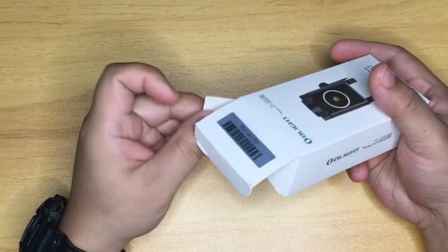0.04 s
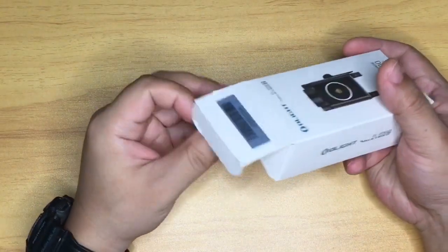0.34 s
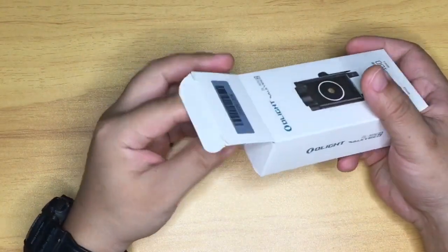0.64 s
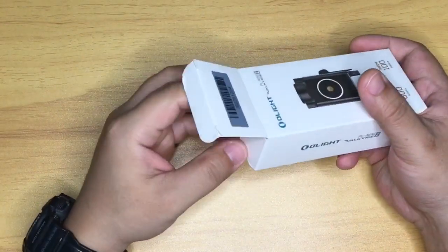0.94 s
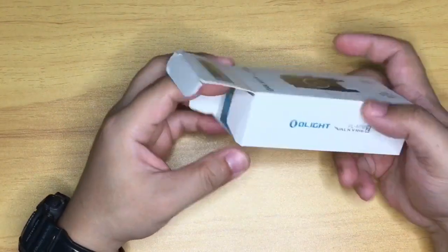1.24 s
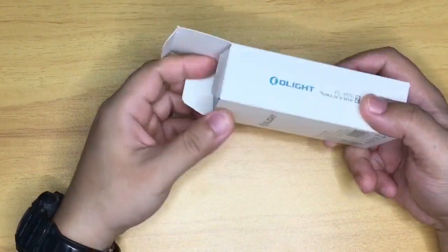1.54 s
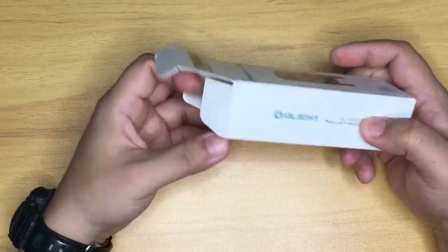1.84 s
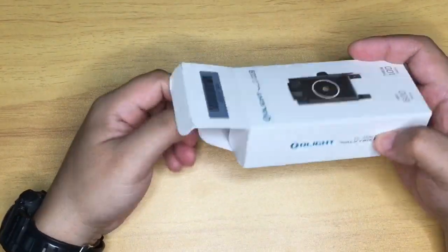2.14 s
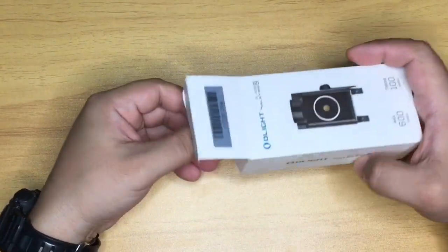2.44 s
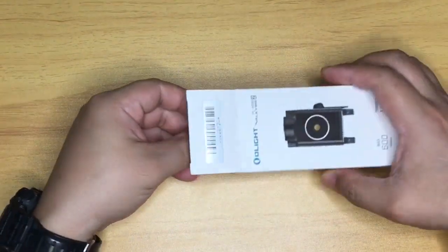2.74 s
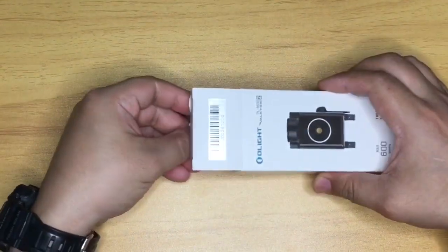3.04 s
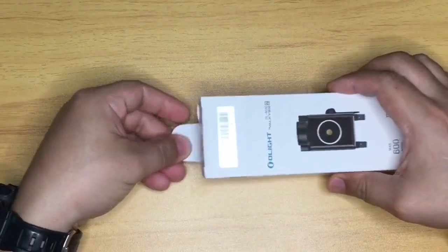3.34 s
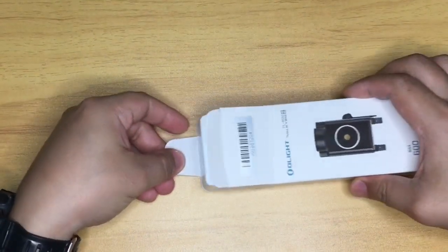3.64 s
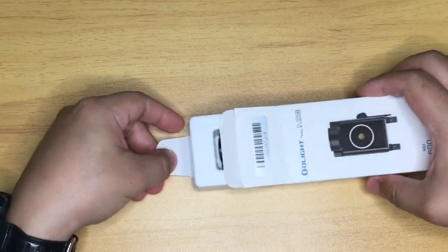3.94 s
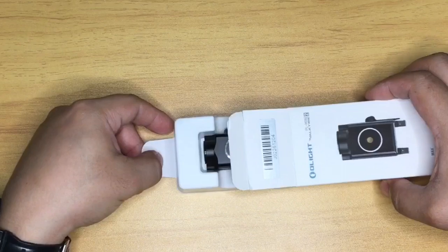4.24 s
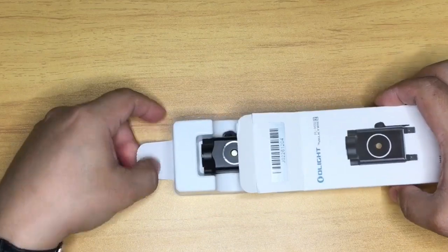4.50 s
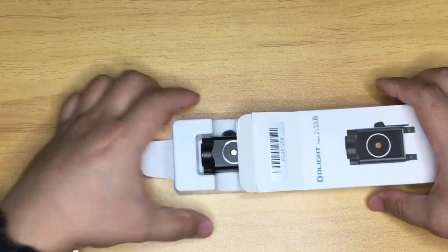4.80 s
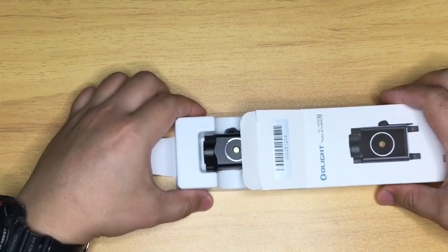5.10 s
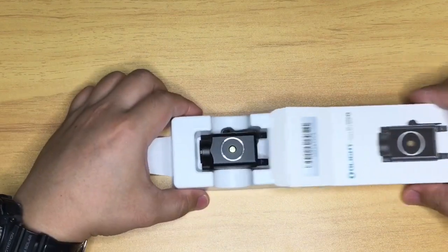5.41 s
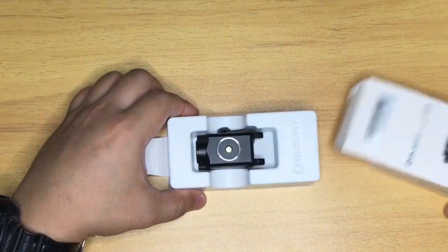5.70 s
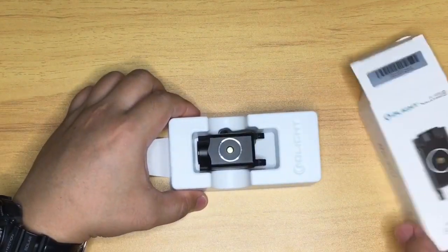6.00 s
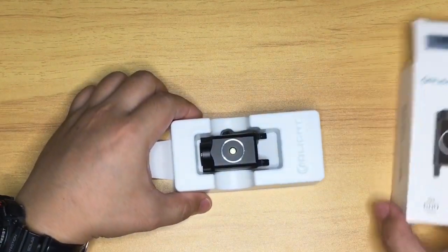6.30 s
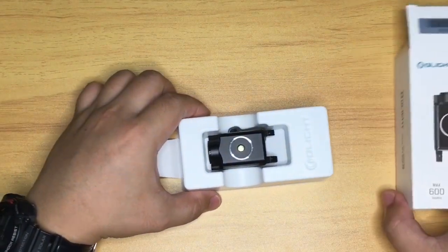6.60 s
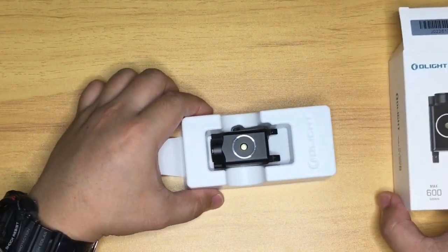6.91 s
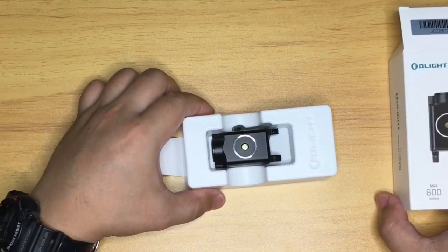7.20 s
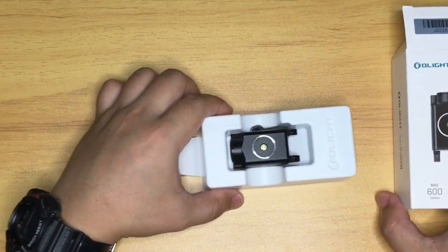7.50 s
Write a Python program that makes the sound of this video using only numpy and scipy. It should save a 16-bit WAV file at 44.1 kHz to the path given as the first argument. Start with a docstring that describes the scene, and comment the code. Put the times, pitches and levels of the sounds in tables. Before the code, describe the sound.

Fingers handle a small paperboard box close to the microphone. At about 0.5 seconds the end flap snaps free in a crisp cluster of clicks, the sharpest sound heard. Until about 4.5 seconds, light ticks and short, soft rubs of skin on card follow, with slight rasps. At 4.5 seconds the inner tray knocks onto the wooden table, making it boom briefly, with a softer knock near 5.1. From about 4.8 to 6.2 seconds the sleeve slides off in several hollow scrapes. Moving air puffs low against the microphone, lightly around 2.3 and 3 seconds and more strongly between 5.3 and 6. After a dull knock near 6.8 seconds, the tray scrapes along the table, with small clicks and a quick cluster of knocks around 7.4. A faint steady hum lies underneath, in a small, live room.

```python
"""At a wooden table in a small live room, hands open a paperboard box. The end flap snaps free and
fingers tick on the card, each slip ringing the box and crackling its fibres. Fingers rub and the sleeve
slides off in a hiss of tiny slips, coloured by the hollow box. The inner tray knocks down, making the
table boom, and is pushed along it. Puffs of moving air buffet a close microphone over a faint hum."""
import sys
import numpy as np
from scipy import signal
from scipy.fft import rfft, irfft, next_fast_len
from scipy.io import wavfile
from scipy.ndimage import uniform_filter1d

SR = 44100
rng = np.random.default_rng(int(sys.argv[2]) if len(sys.argv) > 2 else 0)


def int16_out(signal):
    """Quantize to a 16-bit WAV file."""
    q = np.round(np.clip(np.atleast_2d(signal).T, -1, 1) * 32767)
    wavfile.write(sys.argv[1], SR, q.astype(np.int16))


N = 332955
TIME = np.arange(N) / SR

# The ring of the box. Each row: mode frequency in Hz, relative level in dB, 60 dB decay in seconds.
BOX_MODES = [(368, -6, 0.085), (502, -3, 0.043), (656, -5.5, 0.066), (998, -3.5, 0.031),
             (1204, -14.5, 0.0085), (1457, -8, 0.03), (2472, -6.5, 0.036), (2540, -8.5, 0.015),
             (3054, -11, 0.012), (3593, -3.5, 0.017), (4700, -6.5, 0.023), (5070, -8.5, 0.019)]
# The tone of crackling paper fibres. Each row: frequency in Hz, gain in dB.
FIBRE_COLOUR = [(120, -22), (300, 4.5), (650, -0.5), (800, -7.5), (1100, 4.5), (1900, -6.5), (2600, 0),
                (4000, -2), (5200, -5), (6800, -10.5)]
# Snaps and ticks of the card. Each row: start in seconds, level in dB, pitch of the slipping part in Hz,
# crackle decay in milliseconds.
CARD_CLICKS = [(0.278, -51, 1480, 3), (0.302, -44, 2400, 6.3), (0.4325, -27, 6160, 4.6),
               (0.4359, -44, 1200, 2.3), (0.4572, -33.5, 1600, 2.3), (0.4636, -26.5, 5200, 1.4),
               (.464, -16.5, 2500, 6.7), (0.4653, -21.5, 1150, 1.6), (.4706, -23.5, 3500, 1.3),
               (0.475, -28.5, 4500, 4.1), (.805, -42, 3800, 4.1), (0.8382, -37, 580, 3.1),
               (0.9599, -39, 1000, 2.3), (1.089, -46.5, 1010, 7), (1.100, -42.5, 990, 2.4),
               (1.3255, -37.5, 4700, 4.4), (1.518, -38, 355, 3.6), (1.849, -49, 2580, 6.7),
               (1.9477, -38, 3730, 5.1), (2.0449, -40, 2300, 3.4), (2.057, -40, 600, 4.4),
               (2.0715, -44, 4000, 1.3), (2.2509, -40.5, 2350, 1.5), (2.6557, -48.5, 5030, 5.8),
               (2.671, -45, 610, 4.9), (2.775, -48.5, 2600, 6.8), (2.8236, -42, 1290, 1.1),
               (3.3335, -52, 5030, 3.9), (3.3966, -52.5, 1200, 1.3), (3.6201, -36, 970, 3.8),
               (3.628, -39.5, 2700, 2.4), (5.6421, -36, 4300, 0.53), (5.6429, -34, 1900, 2.3),
               (6.5562, -54, 586, 6), (6.655, -51.5, 1500, 8), (6.8485, -43, 2760, 3.2),
               (7.2137, -39.5, 1140, 9.2), (7.3464, -37, 3300, 3)]
def card_clicks(focus_db=9, focus_octaves=0.46, rise_s=0.00032, crisp_s=0.0033):
    """A slipping card edge rings the box and crackles its fibres. Returns close sound and room send."""
    close, send, t = np.zeros(N), np.zeros(N), TIME[:SR // 8]
    for start, db, pitch_hz, decay_ms in CARD_CLICKS:
        # a full snap rings the whole box; light touches land anywhere, so they vary and crackle more
        snap = min(amp(db + 25), 1)
        light = 1 - snap
        decay_s = max(decay_ms, 0.5) / 1000
        detune = 1 + 0.08 * light * rng.standard_normal()
        scuff_s = light * max(decay_s - crisp_s, 0)  # longer slips take hold gradually
        grip = 1 - np.exp(-(t / (rise_s + scuff_s)) ** 2)
        scatter_db = 3.5 * light * rng.standard_normal(len(BOX_MODES))
        body = hit_level(grip * ring(BOX_MODES, t, scatter_db, detune), 0)
        fibres = hit_level(grip * fibre_crackle(t, decay_s), db=light - 2 * snap)
        # lift the slip's own pitch; a full snap is too quick to drive the lowest modes fully
        tone_db = lambda hz: focus_db * bell(hz, pitch_hz, focus_octaves) - 5 * snap * bell(hz, 460, 1)
        click = equalise(body + fibres, tone_db)
        add(close, start - scuff_s / 2, hit_level(click, db))
        # the small panels ring mostly nearby; the crackle carries further
        add(send, start, hit_level(amp(-7) * body + fibres, db))
    return close, send


def fibre_crackle(t, decay_s):
    """Paper fibres give way in a fast-dying burst of noise."""
    noise = equalise(rng.standard_normal(len(t)), lambda hz: contour(hz, FIBRE_COLOUR))
    return noise * np.exp(-t / decay_s)


# The loaded tray on the table. Each row: mode frequency in Hz, relative level in dB,
# 60 dB decay in seconds.
TRAY_MODES = [(278, -12.5, 0.031), (469, -7, 0.028), (451.2, -20, 0.28), (575, 2, 0.016),
              (716, -12.5, 0.021), (840, -28, 0.27), (1050, -6, 0.016), (1114, -29, .18), (1134, 1.5, 0.01),
              (1714, -3.5, 0.017), (2300, -9.5, 0.019), (2950, -4, 0.0068), (3460, 0, 0.0075)]
# Tray and sleeve landing. Each row: start in seconds, level in dB, contact cut-off in Hz,
# pitch favoured by the struck spot in Hz, boom send in dB.
TABLE_KNOCKS = [(4.5284, -25.5, 2480, 1170, -4.5), (4.5305, -33, 930, 460, -9.5),
                (5.1346, -33, 2770, 1110, -3), (6.8476, -31.5, 840, 278, -4.5),
                (7.3637, -26.5, 2100, 684, -3), (7.378, -30.5, 3800, 1520, -18),
                (7.3818, -26, 2240, 870, -7.5)]
def table_knocks(grit_db=-7, grit_s=0.013, rise_s=0.00049):
    """Blows ring the tray, duller for a soft contact. Returns the knocks and the table top's boom."""
    direct, boom, t = np.zeros(N), np.zeros(N), TIME[:SR // 3]
    mode_hz, _, mode_t60 = np.transpose(TRAY_MODES)
    favour_db = 6 + 30 * mode_t60  # lightly damped modes depend most on the spot struck
    for start, db, contact_hz, spot_hz, boom_db in TABLE_KNOCKS:
        body = ring(TRAY_MODES, t, favour_db * bell(mode_hz, spot_hz, octaves=0.15))
        grit = rng.standard_normal(len(t)) * np.exp(-t / grit_s)
        grit = butter(butter(grit, 140, "high"), 6700, "low")
        knock = (hit_level(body, 0) + hit_level(grit, grit_db)) * (1 - np.exp(-t / rise_s))
        knock = hit_level(butter(knock, contact_hz, "low"), db)
        add(direct, start, knock)
        add(boom, start, amp(boom_db) * knock)
    return direct, butter(boom, 1300, "low", order=4)


# Air in the hollow box colours every scrape. Each row: centre in Hz, width in Hz, boost or cut in dB.
HOLLOW_EQ = [(563, 230, 4.5), (850, 77, -4), (1073, 160, -4), (1885, 250, -6), (2670, 320, 2.5)]
def scrape(gains, colour, slips_per_s, grain_db, judder_db, wander_db, hiss_db, body_db):
    """Dense tiny slips of fibre on fibre: a hiss from the surface and a murmur from the hollow box."""
    slips = (rng.random(N) < slips_per_s / SR) * rng.standard_normal(N)
    slips *= amp(grain_db * np.minimum(rng.exponential(size=N), 4))
    hollow_db = lambda hz: sum(db / (1 + (2 * (hz - f) / width) ** 2) for f, width, db in HOLLOW_EQ)
    rub = equalise(slips, lambda hz: contour(hz, colour) + hollow_db(hz))
    rub *= amp(judder_db * drift(110))
    # as the point of contact moves, each band of the hiss swells by itself
    below = [equalise(rub, lambda hz: -20 * np.log10(1 + (hz / edge_hz) ** 10))
             for edge_hz in (1600, 2900, 4200, 5500)]
    hiss = sum(band * amp(wander_db * drift(12)) for band in np.diff(below + [rub], axis=0))
    return unit(hiss) * gains[0] * amp(hiss_db) + unit(below[0]) * gains[1] * amp(body_db)


# The tone of skin on card. Each row: frequency in Hz, gain in dB.
RUB_COLOUR = [(240, -31), (400, 1), (484, -14), (573, -7), (811, -9), (994, -4), (1770, -11.5),
              (2240, -10.5), (3030, -14), (3330, -12), (4600, -12), (5640, -14), (7000, -22.5), (9100, -55),
              (15400, -120)]
# Strokes of fingers and flap. Each row: start and length in seconds, hiss and body in relative dB.
RUB_STROKES = [(0, 0.043, -55, -58), (.1, 0.093, -64, -64), (.295, 0.023, -46, -53), (.37, 0.12, -40, -47),
               (.47, 0.12, -45, -59), (.74, 0.078, -54.5, -56), (.92, 0.14, -58, -54),
               (1.09, .18, -56, -54), (1.32, 0.15, -61, -59), (1.475, 0.049, -47, -51),
               (1.84, 0.046, -52.5, -54), (1.93, 0.15, -53.5, -53.5), (2.08, 0.21, -59, -56),
               (2.3, 0.12, -54.5, -57.5), (2.72, 0.055, -54, -57), (2.8, 0.039, -54.5, -55),
               (2.91, 0.21, -56, -62), (3.25, 0.076, -57.5, -56.5), (3.41, 0.16, -54, -53.5),
               (3.53, 0.07, -49, -47.5), (3.68, 0.095, -60, -61), (3.82, 0.053, -58, -59),
               (3.99, 0.074, -53.5, -50), (4.16, .1, -57, -54), (4.34, 0.055, -54.5, -49),
               (4.42, .1, -57.5, -56), (4.56, 0.15, -59, -59), (6.6, 0.054, -64, -57)]
def finger_rub():
    """Fingers and flap drag over the card in short, juddering strokes."""
    return scrape(strokes(RUB_STROKES), RUB_COLOUR, slips_per_s=4900,
                  grain_db=0.5, judder_db=2.2, wander_db=3, hiss_db=-2, body_db=-2.5)


def finger_ticks(catches_per_s=16):
    """Faint catches of the card come by chance while the fingers rub, and ring the box."""
    t = TIME[:SR // 8]
    rubbing, _ = strokes(RUB_STROKES)
    catches = (rng.random(N) < catches_per_s / SR) * (1 + rng.random(N))
    body = ring(BOX_MODES, t, np.zeros(len(BOX_MODES)))
    tick = hit_level(body, -2.5) + hit_level(fibre_crackle(t, decay_s=0.002), 0)
    return unit(signal.fftconvolve(catches, tick)[:N]) * rubbing * amp(-9)


# The tone of card on card. Each row: frequency in Hz, gain in dB.
SLIDE_COLOUR = [(190, -55), (330, -11), (356, 1), (490, -1.5), (572, 1), (666, 0), (787, -10), (991, 0),
                (1590, -6.5), (1930, -13.5), (2240, -11.5), (2720, -17), (3470, -19), (6240, -19.5),
                (7000, -34.5), (9100, -70), (15400, -120)]
# Pulls on the sleeve. Each row: start and length in seconds, hiss and body in relative dB.
SLEEVE_PULLS = [(4.77, 0.19, -57, -55.5), (4.85, 0.28, -52, -48.5), (5.1, 0.15, -57.5, -45.5),
                (5.19, .2, -52.5, -48.5), (5.48, 0.17, -55.5, -50), (5.63, 0.092, -54, -47),
                (5.7, 0.2, -62.5, -55.5), (5.89, 0.099, -55.5, -49), (5.98, 0.1, -62, -57),
                (6.11, 0.12, -66.5, -68.5)]
def sleeve_slide():
    """The sleeve slides off the tray with a hollow scrape and is laid aside."""
    return scrape(strokes(SLEEVE_PULLS), SLIDE_COLOUR, slips_per_s=5800,
                  grain_db=-1.5, judder_db=1.5, wander_db=6, hiss_db=3, body_db=-2.5)


# The tone of card on wood. Each row: frequency in Hz, gain in dB.
PUSH_COLOUR = [(240, -42.5), (400, -16.5), (566, -10.5), (801, -14), (1090, -3.5), (1280, -12), (1680, -6),
               (1850, -2.5), (2040, -2.5), (2990, -8.5), (4490, -11), (6510, -15), (7000, -27.5),
               (9100, -51), (15400, -120)]
# The swell and fade of the push. Each row: time in seconds, hiss and body in relative dB.
PUSH_CURVE = [(6.844, -58, -48), (6.894, -56, -52.5), (7.034, -55.5, -51), (7.054, -52.5, -46),
              (7.214, -43, -52), (7.333, -47.5, -55), (7.55, -59.5, -57)]
def tray_push():
    """The tray scrapes along the table in one unbroken push."""
    times, *curves_db = np.transpose(PUSH_CURVE)
    gains = [amp(np.interp(TIME, times, db, left=-120, right=-120)) for db in curves_db]
    return scrape(uniform_filter1d(gains, size=400), PUSH_COLOUR, slips_per_s=3800,
                  grain_db=0.9, judder_db=1.4, wander_db=3.5, hiss_db=-2.5, body_db=-2)


# Pitched rasps. Each row: start and length in seconds, pitch in Hz, width in octaves, level in dB.
RASPS = [(1.147, 0.61, 332, 0.18, -57.5), (1.931, 0.13, 3880, 0.2, -56), (2.196, 0.061, 4870, 0.061, -57.5),
         (3.505, 0.073, 4870, 0.092, -56.5), (3.564, 0.089, 547, 0.043, -52),
         (4.88, 0.087, 1270, 0.52, -50.5), (5.244, 0.17, 2650, .2, -56), (7.08, .22, 1117, .07, -54)]
def rasps():
    """Skin or a card edge sticks and slips almost regularly, giving a narrow band of noise."""
    out = np.zeros(N)
    for start, length, pitch_hz, octaves, db in RASPS:
        noise = rng.standard_normal(SR)[:int(length * SR)]
        rasp = equalise(noise, lambda hz: -20 * np.log10(1 + (np.log2(hz / pitch_hz) / octaves) ** 2))
        add(out, start, amp(db) * unit(rasp * signal.windows.tukey(len(rasp), 0.3)))
    return out


# Sweeps of hand and sleeve through the air. Each row: start and length in seconds, level in dB.
AIR_SWEEPS = [(2.245, 0.27, -34.5), (2.955, 0.18, -41.5), (5.295, 0.24, -26), (5.685, .18, -28),
              (6.05, .25, -43)]
def air_puffs(stir_s=0.051, settle_s=0.21, still_db=-54):
    """Slow eddies buffet the microphone: the air picks up quickly, settles slowly, never quite rests."""
    eddies = butter(butter(rng.standard_normal(N), 28, "low"), 2.5, "high")
    power = amp(still_db) ** 2
    for start, length, db in AIR_SWEEPS:
        power += (amp(db) * gesture(start, length, stir_s, settle_s)) ** 2
    return unit(butter(eddies, 190, "low")) * np.sqrt(power)


def room_tail(send, low_t60_s=0.57, high_t60_s=0.62, build_s=0.0017):
    """The walls return a diffuse tail that builds up just after the direct sound."""
    t = TIME[:int(SR * 0.7)]
    noise = rng.standard_normal(len(t))
    low = butter(noise, 1500, "low", order=1)
    tail = low * amp(-60 * t / low_t60_s) + (noise - low) * amp(-60 * t / high_t60_s)
    tail *= 1 - np.exp(-(t / build_s) ** 2)
    return signal.fftconvolve(send, tail / np.sqrt(np.sum(tail ** 2)))[:N]


# The tones of the hum. Each row: frequency in Hz, level in dB.
HUM_TONES = [(120, -54.5), (179, -65), (233, -60), (266, -58.5), (399, -68)]
def hum():
    """Mains and a fan hum, each tone wavering gently in level and phase."""
    out = np.zeros(N)
    for hz, db in HUM_TONES:
        peak = np.sqrt(2) * amp(db + 0.79 * drift(4.4))
        out += peak * np.sin(2 * np.pi * hz * TIME + 0.12 * drift(5.6))
    return out


# The dark colour of the room tone. Each row: frequency in Hz, gain in dB.
HUSH_COLOUR = [(25, -2), (50, -2), (65, -6), (92, -20), (160, -8), (210, -13), (330, -18.5), (420, -22.5),
               (560, -24.5), (1000, -30), (2000, -35.5), (7000, -48)]
def room_hush(db=-56):
    """A steady bed of noise, its level set by the part above 140 Hz."""
    hush = equalise(rng.standard_normal(N), lambda hz: contour(hz, HUSH_COLOUR))
    return amp(db) * hush / np.std(butter(hush, 140, "high"))


def strokes(table, gather_share=0.31, press_db=2, let_go_s=0.025):
    """Hiss and body gains for hand strokes: each gathers speed, presses harder and lets go."""
    power = np.zeros((2, N))
    for start, length, hiss_db, body_db in table:
        progress = np.clip((TIME - start) / length, 0, 1)
        stroke = amp(press_db * (progress - 1)) * gesture(start, length, gather_share * length, let_go_s)
        power += np.outer(amp([hiss_db, body_db]), stroke) ** 2
    return np.sqrt(power)


def gesture(start, length, attack_s, release_s):
    """Envelope of one movement: attack, hold, release."""
    t = np.maximum(TIME - start, 0)
    return (1 - np.exp(-(t / attack_s) ** 2)) * np.exp(-np.clip((t - length) / release_s, 0, 20))


def ring(modes, t, gains_db, detune=1):
    """Struck modes dying away; neighbours swing in opposite directions."""
    return sum((-1) ** k * amp(db + gains_db[k] - 60 * t / t60) * np.sin(2 * np.pi * hz * detune * t)
               for k, (hz, db, t60) in enumerate(modes))


def drift(points_per_s):
    """A random wobble with a spread near 1."""
    return np.interp(TIME * points_per_s, np.arange(8192), rng.standard_normal(8192))


def equalise(x, db_at):
    """Filter by a gain in dB that is a function of frequency."""
    size = next_fast_len(len(x) + 2048)
    hz = np.maximum(np.arange(size // 2 + 1) * SR / size, 1)
    return irfft(rfft(x, size) * amp(db_at(hz)), size)[:len(x)]


def contour(hz, points):
    """An EQ curve joining (Hz, dB) points on a log-frequency axis."""
    point_hz, db = np.transpose(points)
    return np.interp(np.log(hz), np.log(point_hz), db)


def bell(hz, centre_hz, octaves):
    """A bell curve, 1 at the centre, on a log-frequency axis."""
    return np.exp(-(np.log2(hz / centre_hz) / octaves) ** 2)


def butter(x, hz, kind, order=2):
    """Causal low-pass or high-pass."""
    return signal.sosfilt(signal.butter(order, min(hz, SR / 3), kind, fs=SR, output="sos"), x)


def amp(db):
    """Decibels to gain."""
    return 10 ** (np.asarray(db) / 20)


def unit(x):
    """Scale to rms 1."""
    return x / np.sqrt(np.mean(x ** 2))


def hit_level(x, db):
    """Scale a hit to a level, as if all its energy fell within 8 ms."""
    return x * amp(db) / np.sqrt(np.sum(x ** 2) / (0.008 * SR))


def add(out, start_s, sound):
    """Mix a sound in at a time."""
    i = int(start_s * SR)
    out[i:i + len(sound)] += sound[:len(out) - i]


def scene():
    """Clicks, knocks and scrapes share one room, over puffs of air, hum and hush."""
    clicks, click_send = card_clicks()
    knocks, boom = table_knocks()
    scrapes = finger_rub() + sleeve_slide() + tray_push() + rasps() + finger_ticks()
    reverb = room_tail(amp(-6.5) * click_send + boom + amp(-3.5) * scrapes)
    return (clicks + knocks + scrapes + reverb + air_puffs() + hum() + room_hush())[None]


def record(dry, top_hz=7000):
    """A steep low-pass cuts off the top of the treble."""
    return signal.sosfilt(signal.ellip(10, 0.2, 70, top_hz, fs=SR, output="sos"), dry)


dry = scene()
out = record(dry)
int16_out(out)
```